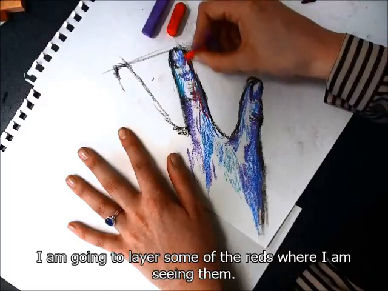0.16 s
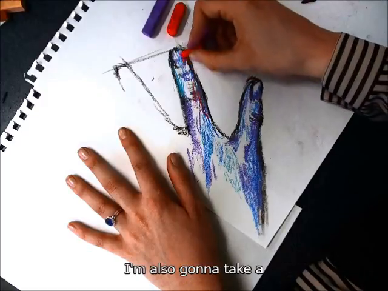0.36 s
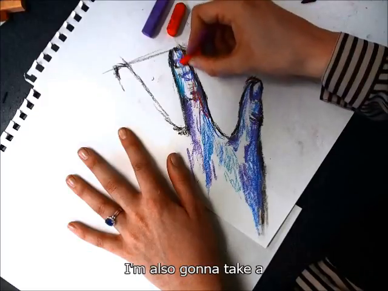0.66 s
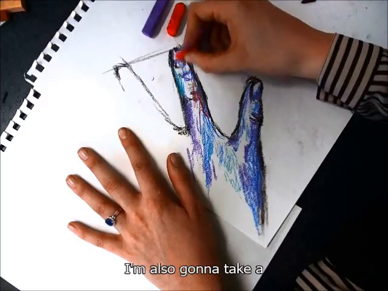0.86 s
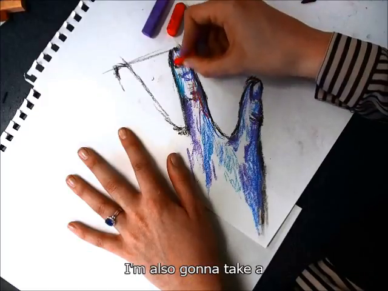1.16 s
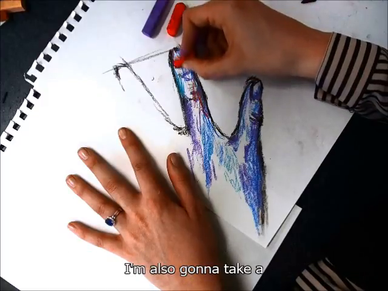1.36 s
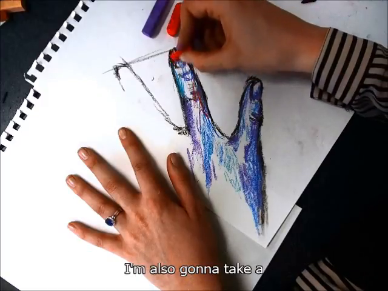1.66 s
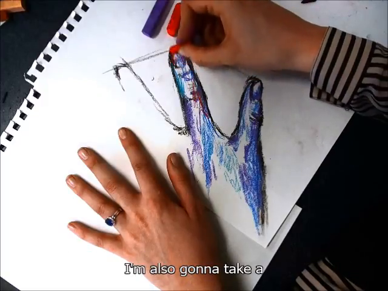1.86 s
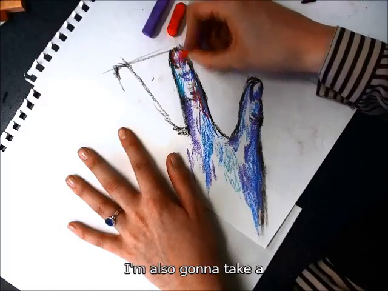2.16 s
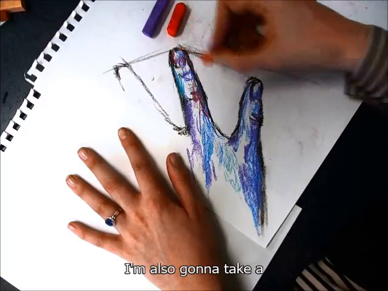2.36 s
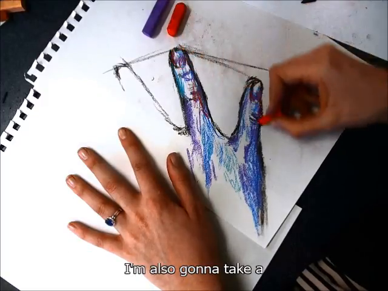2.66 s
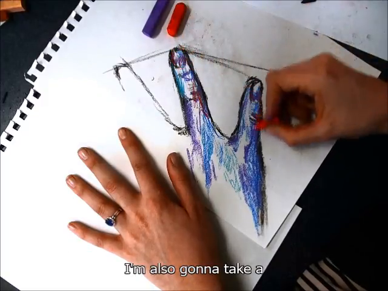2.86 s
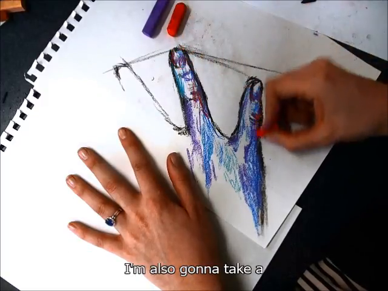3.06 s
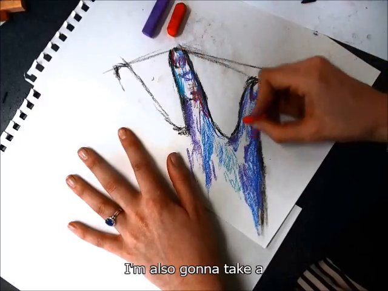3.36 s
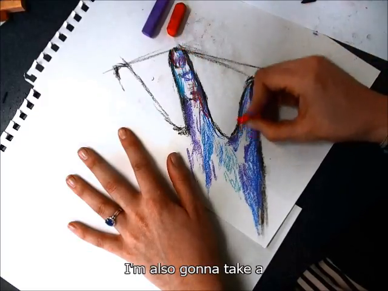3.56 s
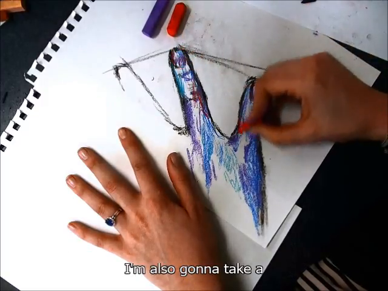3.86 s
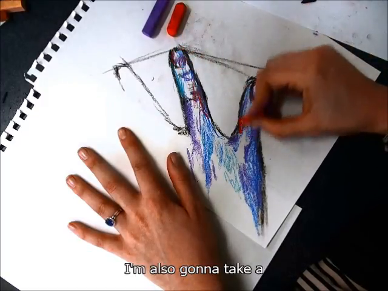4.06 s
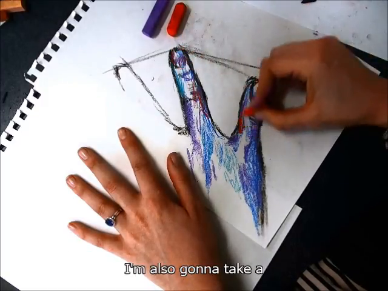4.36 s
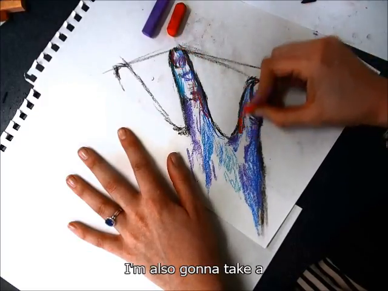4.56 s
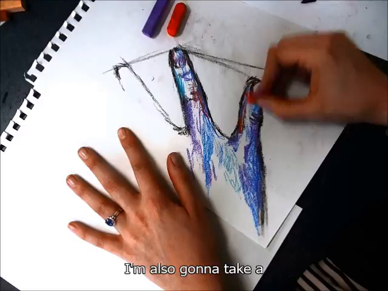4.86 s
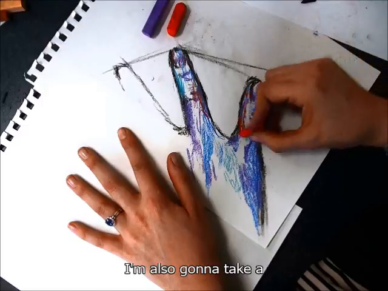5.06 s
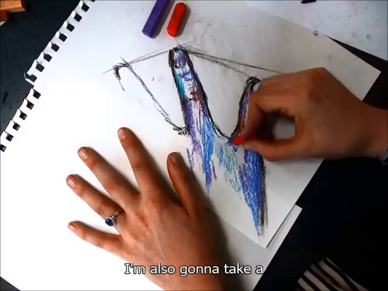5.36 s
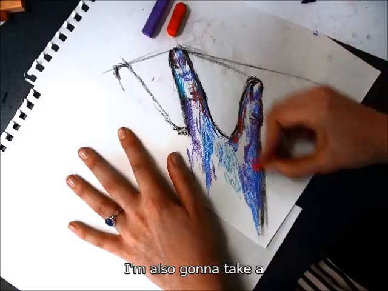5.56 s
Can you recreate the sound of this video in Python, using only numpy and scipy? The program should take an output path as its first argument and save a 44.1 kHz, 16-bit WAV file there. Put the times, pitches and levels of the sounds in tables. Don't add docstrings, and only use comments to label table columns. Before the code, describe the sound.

Close, grainy pastel strokes over paper in a quiet room with faint fan whine, broken by a clattery hand shift and soft low thumps.

```python
import sys
import numpy as np
from scipy import signal
from scipy.fft import rfft, irfft, next_fast_len
from scipy.io import wavfile
from scipy.ndimage import uniform_filter1d

SR = 44100
rng = np.random.default_rng(int(sys.argv[2]) if len(sys.argv) > 2 else 0)


def int16_out(signal):
    q = np.round(np.clip(np.atleast_2d(signal).T, -1, 1) * 32767)
    wavfile.write(sys.argv[1], SR, q.astype(np.int16))


def voltage_ratio(decibels):
    exponent = np.asarray(decibels, float) / 20
    return 10 ** exponent


N = 252428
T = np.arange(N) / SR
HAND_MOVES_S = 2.8


def evened(x):
    return x / np.sqrt(np.mean(x ** 2) + 1e-20)


def read(points, hz):
    f, value = np.transpose(points)
    return np.interp(np.log(hz + 1), np.log(f + 1), value)


def coloured(x, shape):
    size = next_fast_len(N)
    gain = shape(np.fft.rfftfreq(size, 1 / SR))
    return irfft(rfft(x, size) * gain, size)[:N]


def add(mix, s, sound):
    part = mix[round(s * SR):][:len(sound)]
    part += sound[:len(part)]


def ring(hz, t60, rise):
    t = np.arange(int(t60 * SR) + 8) / SR
    return np.sin(2 * np.pi * hz * t) * voltage_ratio(-60 * t / t60) * (1 - np.exp(-t / rise))


def push(hz):
    u = np.arange(200) / SR * hz * 2 * np.pi
    return u * (1 - u / 2.6) * np.exp(1 - u)


def slow(rate_hz, count):
    t = np.arange(0, N / SR + .02, .01)
    hz = rate_hz * rng.random((count, 12, 1))
    start = rng.random(hz.shape)
    rows = np.sin(2 * np.pi * (hz * t + start)).sum(1) / np.sqrt(6)
    return np.array([np.interp(T, t, row) for row in rows])


def air():
    # (f/Hz, level/dB per Hz)
    air_colour = [(10, -13), (22, -4.5), (42, -15.5), (120, -24), (450, -29.5), (720, -29), (880, -34),
                  (1080, -32), (1470, -37), (3500, -42), (4300, -42), (6000, -45), (7100, -42.5),
                  (9000, -60)]
    hiss = coloured(rng.standard_normal(N), lambda hz: voltage_ratio(read(air_colour, hz)))
    middle = coloured(hiss, lambda hz: (hz > 100) * (hz < 8000))
    return hiss * voltage_ratio(-58.5) / np.std(middle)


def fan():
    whine_hz = [60, 207, 359, 530, 586, 610, 675, 704, 716, 728, 750, 759, 818, 846, 943, 990, 1050, 1065,
                1087, 1136, 1182, 1272, 1341, 2400, 2448, 2519, 3117, 3235]
    whine_db = [-64, -76, -77, -68.5, -73.5, -73.5, -77.5, -70, -75, -64.5, -70, -67.5, -83, -75.5, -78.5,
                -79, -77, -70.5, -70.5, -80, -80, -78, -79, -83.5, -83, -82, -82.5, -86]
    wobble_hz, wobble_db = 1.2, 2.25
    count = len(whine_hz)
    hz = np.array(whine_hz)[:, None] + wobble_hz * slow(9., count)
    level = voltage_ratio(np.array(whine_db)[:, None] + wobble_db * slow(3.8, count))
    level[whine_hz.index(728)] *= voltage_ratio(0.8 * (T - T.mean()))
    tones = level * np.sin(2 * np.pi * np.cumsum(hz, axis=1) / SR)
    return np.sqrt(2) * tones.sum(0)


def rumble():
    low = coloured(rng.standard_normal(N), lambda hz: 1 / (1 + ((hz - 90) / 30) ** 4))
    fade_s = .65
    return voltage_ratio(-59.5) * evened(low) / (1 + (T / fade_s) ** 6)


def stand():
    # (t/s, level/dB)
    sway_points = [(0.0, -47.5), (0.17, -39), (0.4, -47.5), (1.19, -36), (1.66, -47.5), (1.8, -40.5),
                   (2.05, -46.5), (2.47, -33.5), (2.61, -38.5), (2.83, -30.5), (3.05, -38), (3.4, -53.5),
                   (3.53, -33), (3.73, -47), (4.1, -40.5), (4.55, -54), (4.9, -40), (5.72, -39)]
    # (t/s, direction +1 or -1, peak level/dB, f/Hz, 60 dB decay/s)
    jolt_list = [(0, 1, -38.5, 30, 0.54), (0.11, -1, -40, 28, 0.22), (1.893, 1, -37, 103, 0.12),
                 (1.897, -1, -41.5, 172, 0.052), (2.126, 1, -38.5, 85, 0.099), (3.479, -1, -31, 91, 0.1),
                 (3.488, -1, -31, 29, 0.043), (3.495, 1, -29, 42, .04), (3.496, 1, -15.5, 24.4, 0.18),
                 (3.503, 1, -43, 15, 0.43), (3.601, 1, -47, 42, 0.3), (5.468, -1, -38, 50, 0.065),
                 (5.484, 1, -32, 41, 0.22), (5.561, -1, -38, 79, .1), (5.57, 1, -30, 23, .2),
                 (5.612, 1, -29.5, 26, 0.56), (5.688, 1, -37, 46, 0.26)]
    sway_hz = 11.5
    s, sway_db = np.transpose(sway_points)
    out = np.sqrt(2) * voltage_ratio(np.interp(T, s, sway_db)) * np.sin(2 * np.pi * sway_hz * T)
    for at, direction, db, hz, t60 in jolt_list:
        add(out, at, np.sign(direction) * voltage_ratio(db) * ring(hz, t60, 0.0041))
    return out


def reflections(x):
    t = np.arange(5000) / SR
    tail = rng.standard_normal(5000) * voltage_ratio(-60 * t / 0.03) * (t > .002)
    return signal.fftconvolve(x, tail / np.linalg.norm(tail))[:N]


def rustle():
    # (peak t/s, rise/s, fall/s, level/dB)
    drag_list = [
        (3.39, .6, 0.089, -57),
        (3.485, 0.014, 0.17, -53),
        (3.822, 0.046, 0.085, -61.5),
        (4.15, 0.75, 0.046, -63.5),
        (5.416, 0.26, .04, -57.5),
        (5.544, 0.24, 0.078, -55),
        (5.72, 0.18, .1, -56),
    ]
    fade_db = 19.5
    level = np.zeros(N)
    for s, rise, fall, db in drag_list:
        distance = np.where(T < s, (s - T) / rise, (T - s) / fall)
        level += voltage_ratio(db - 6.5 - fade_db * distance)
    strength = voltage_ratio(3. * np.minimum(rng.exponential(1, N), 3))
    crackle = strength * (rng.random(N) < 1500 / SR) * rng.standard_normal(N)
    crackle = coloured(crackle, lambda hz: (hz / 1500) ** 2 / (1 + (hz / 1500) ** 4.3))
    rub = coloured(rng.standard_normal(N), lambda hz: (hz / 130) ** 2 / (1 + (hz / 130) ** 3.4))
    return level * (evened(crackle) + voltage_ratio(3.5) * evened(rub))


def taps():
    # (t/s, peak level/dB, f/Hz)
    tap_list = [(1.8689, -44, 700), (1.8882, -44.5, 900), (2.1217, -41, 600), (3.0305, -37.5, 1400),
                (3.1774, -41, 2200), (3.2133, -38.5, 1500), (3.228, -40, 2200), (3.2553, -45, 2000),
                (3.268, -47, 1200), (3.2807, -39.5, 1500), (3.302, -42.5, 2400), (3.3217, -42.5, 2400),
                (3.345, -39, 1200), (3.3498, -38, 1500), (3.354, -39.5, 1250), (3.383, -40.5, 1200),
                (3.3933, -48, 2200), (3.529, -48, 2000), (3.6081, -41.5, 1000), (3.654, -38.5, 2180),
                (3.7335, -33.5, 910), (3.745, -34, 1000), (3.9096, -43, 700), (3.9332, -32.5, 900),
                (5.408, -43, 1000), (5.5105, -53, 1000), (5.5327, -48, 1000), (5.5611, -47, 1000),
                (5.6845, -41.5, 1500)]
    # (f/Hz, level/dB, 60 dB decay/s)
    pad_modes = [(320, 2, .055), (520, -4, .035), (200, -3, .05), (120, -2, .08)]
    # (tap f/Hz, ring level against the tap/dB)
    pad_share = [(700, -15.), (900, -9.5), (1000, -10.5), (1200, -18.5)]
    out = np.zeros(N)
    fade = voltage_ratio(-60 * np.arange(900) / SR / .03)
    for s, db, hz in tap_list:
        direction = 1 if s < HAND_MOVES_S else -1
        add(out, s + .001, direction * voltage_ratio(db + 5) * push(hz))
        chatter = np.convolve(rng.standard_normal(900) * fade, push(1100.))
        add(out, s + 0.002163, voltage_ratio(db - 20) * chatter)
        for mode_hz, mode_db, t60 in pad_modes:
            ring_db = db + read(pad_share, hz) + mode_db + 3
            add(out, s + 0.00261, voltage_ratio(ring_db) * ring(mode_hz, t60, 0.002))
    return out


def crumbs():
    # (t/s, peak level/dB, f/Hz)
    snap_list = [(0.259, -48.5, 7300), (0.679, -46, 6000), (0.408, -46, 6030), (1.3067, -45.5, 6070),
                 (1.365, -43.5, 4680), (2.367, -49, 4470), (3.2147, -39, 4300), (3.3832, -46.5, 6770),
                 (3.3937, -41, 3300), (3.49, -44.5, 4760), (3.5015, -34, 4740), (3.5154, -43, 4100),
                 (3.539, -40.5, 4450), (3.6018, -42, 3600), (3.6114, -52.5, 4000), (3.6468, -45, 7200),
                 (4.835, -56, 6300), (5.4087, -47, 4000), (5.4152, -39, 4500), (5.438, -42.5, 6100),
                 (5.455, -42, 4030), (5.476, -46, 4190), (5.496, -50, 4500), (5.5114, -45, 6800),
                 (5.536, -40, 3920), (5.5602, -41.5, 5640), (5.5689, -46.5, 3800), (5.6848, -35.5, 4540)]
    out = np.zeros(N)
    fade = voltage_ratio(-60 * np.arange(98) / SR / .003)
    for s, db, hz in snap_list:
        splinter = np.diff(rng.standard_normal(100), 2) * fade
        add(out, s + 0.00098, voltage_ratio(db - 6.5) * splinter)
        add(out, s + 0.00078, voltage_ratio(db + 11) * ring(hz, 0.0012, .0001))
    return out


def scratch(paper):
    def shape(hz):
        return voltage_ratio(read(paper, hz)) / (1 + (hz / 7900) ** 40)
    return lambda grains: evened(coloured(grains, shape))


def strokes():
    # (middle t/s, length at half power/s, pressure level/dB)
    early_strokes = [(0.163, 0.063, -69.5), (0.203, 0.013, -69.5), (0.28, 0.03, -71.5), (0.435, 0.016, -69),
                     (0.519, 0.031, -66.5), (0.702, 0.029, -61.5), (0.886, 0.034, -61.5),
                     (1.056, 0.022, -65), (1.226, 0.017, -65), (1.395, 0.03, -64.5), (1.571, 0.024, -61),
                     (1.746, 0.033, -60.5), (1.962, 0.035, -63.5), (2.143, 0.029, -67.5),
                     (2.247, 0.034, -68.5), (2.313, 0.021, -54), (2.404, 0.042, -72.5)]
    # (middle t/s, length at half power/s, pressure level/dB)
    late_strokes = [(3.138, 0.044, -62.5), (3.329, 0.032, -61), (3.437, 0.02, -69.5), (3.605, 0.0064, -65),
                    (3.726, 0.031, -60.5), (3.825, 0.018, -63.5), (3.921, 0.031, -60), (4.012, 0.032, -61),
                    (4.102, 0.03, -60), (4.199, 0.034, -59), (4.29, 0.032, -57), (4.392, 0.025, -60),
                    (4.47, 0.026, -57), (4.58, 0.012, -62), (4.636, 0.021, -57.5), (4.736, 0.014, -59),
                    (4.799, 0.027, -60), (4.84, 0.01, -64), (4.882, 0.02, -67), (4.941, 0.015, -57.5),
                    (5.065, 0.015, -62), (5.148, 0.072, -70), (5.383, 0.024, -64.5), (5.446, 0.019, -65),
                    (5.529, 0.021, -63)]
    # (f/Hz, level/dB per Hz)
    early_paper = [(700, -30), (1100, -9), (1700, -14), (2200, -11), (3600, -13), (4150, -1), (4750, 1),
                   (5250, -10), (5700, -6), (6200, -7), (6850, 1), (7300, -2), (7650, -6), (9000, -12)]
    # (f/Hz, level/dB per Hz)
    late_paper = [(700, -12), (1150, -1), (1700, -5), (2600, -10), (3400, -9), (4000, -3), (4400, -3),
                  (4700, 4.5), (5150, -6), (5600, -2), (6300, -4), (6700, -3), (7100, -4), (9000, -8)]
    # (from t/s, tilt level/dB)
    grip = [
        (0, .6),
        (2.2, 5.5),
        (2.8, 1.3),
        (5.2, -1),
    ]
    low, high = np.zeros(N), np.zeros(N)
    for s, length, db in early_strokes + late_strokes:
        tilt_db = [tilt for start, tilt in grip if start <= s][-1]
        u = (T - s) / length
        steepness = np.where(u < 0, .8, 1.3)
        swell = voltage_ratio(db + 1.4) * np.exp(-1.4 * steepness * abs(u) ** 4.25)
        swell += voltage_ratio(db - 17.0) * np.exp(-.25 * u ** 2)
        low += swell * voltage_ratio(-tilt_db / 2)
        high += swell * voltage_ratio(tilt_db / 2)

    strength = voltage_ratio(1.6 * rng.exponential(1, N))
    grains = strength * (rng.random(N) < 9000 / SR) * rng.standard_normal(N)
    grains *= voltage_ratio(2.0 * evened(uniform_filter1d(rng.standard_normal(N), 130)))
    hiss = np.where(T < HAND_MOVES_S, scratch(early_paper)(grains), scratch(late_paper)(grains))
    top = coloured(hiss, lambda hz: 1 / (1 + (5500 / (hz + 1)) ** 12))
    return low * (hiss - top) + high * top


def scene():
    background = air() + fan() + rumble() + stand()
    hand = rustle() + taps() + crumbs() + strokes()
    return (background + hand + voltage_ratio(-11.0) * reflections(hand))[None]


def band_limit(x):
    return signal.sosfilt(signal.butter(12, 8320, fs=SR, output="sos"), x)


def record(dry):
    limited = coloured(dry[0], lambda hz: 1 / np.sqrt(1 + (hz / 7750) ** 60))
    return band_limit(limited[None])


dry = scene()
out = record(dry)
int16_out(out)
```